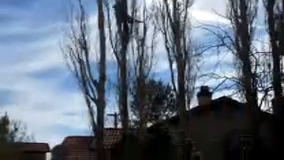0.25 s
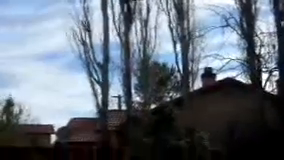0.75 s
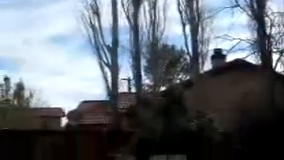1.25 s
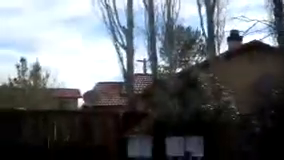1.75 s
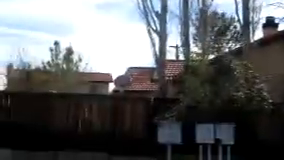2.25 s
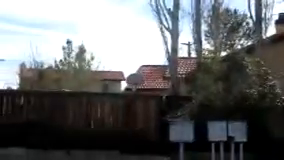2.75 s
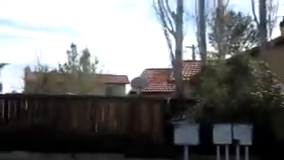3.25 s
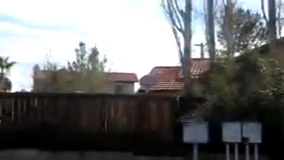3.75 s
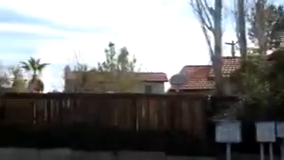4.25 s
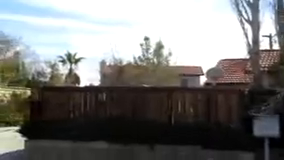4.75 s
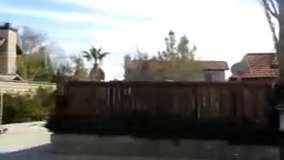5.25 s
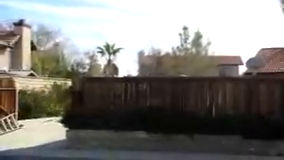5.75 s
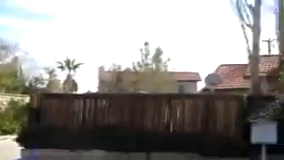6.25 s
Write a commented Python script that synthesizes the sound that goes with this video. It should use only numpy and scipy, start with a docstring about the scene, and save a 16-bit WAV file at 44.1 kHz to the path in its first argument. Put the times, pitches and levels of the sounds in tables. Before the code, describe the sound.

A two-stroke chainsaw is pull-started high in a tree, with a hiss and a few plastic knocks. It catches, blips twice with a brief clutch rattle and climbs to a sputtering top speed. It sinks to an uneven, booming idle with faint ticks and two tiny chirps, then revs again. The microphone is across the street, with light wind, a far hum and short echoes off houses.

```python
"""Light wind and a far hum. High in a tree a two-stroke chainsaw is pulled: the fan hisses, the casing
knocks, the engine catches. Exhaust pops, crank and sprocket tones and chain hiss rise in two blips, the
clutch rattling at first, then climb to a misfiring limit. The saw drops to an uneven, booming idle; faint
bursts of bright noise and two chirps are heard; it revs again. A microphone across the street hears it
directly, off the ground and off houses and fences."""
import sys
import numpy as np
from scipy import signal
from scipy.fft import rfft, irfft, next_fast_len
from scipy.io import wavfile
from scipy.ndimage import uniform_filter1d

SR = 44100
rng = np.random.default_rng(int(sys.argv[2]) if len(sys.argv) > 2 else 0)


def dump(signal):
    """Clip the signal to [-1, 1] and save it as 16-bit WAV at the path in sys.argv[1]."""
    limited = np.clip(np.atleast_2d(signal).T, -1, 1)
    pcm = np.round(limited * 32767).astype(np.int16)
    wavfile.write(sys.argv[1], SR, pcm)


N = 285768
CRUISE_HZ = 150  # reference crank speed

# Crank speed between the revs. Each row: time in seconds, speed in Hz.
IDLE_SPEED = [(2.54, 53), (2.62, 45), (2.76, 38.5), (2.82, 41), (2.87, 54), (2.92, 58), (3, 46), (3.15, 38),
              (3.3, 31), (3.7, 27.5), (5, 27.5), (5.2, 31), (5.24, 38), (5.29, 40), (5.32, 50)]
# Each row: start and end in seconds, n (every nth firing is weak), loss in dB.
MISFIRES = [(1.645, 1.9, 3, 11), (6.045, 6.6, 2, 6)]
# Muffler response. Each row: frequency in Hz, gain in dB.
MUFFLER_RESPONSE = [(25, -57.5), (60, -24), (130, -8.5), (230, -4), (280, 4), (330, -5.5), (400, -1),
                    (440, 0), (490, 3), (580, 0), (700, 4), (790, 3.5), (900, -3), (1050, 1.5),
                    (1200, -4.5), (1300, -9.5), (1800, -21), (2800, -21.5), (5000, -44), (9000, -66)]


def gain_of(db):
    """dB to a factor."""
    return 10 ** (np.asarray(db) / 20)


def evened(x, span_s=0.054):
    """Divides out the slow level, leaving rms 1."""
    return x / np.sqrt(abs(uniform_filter1d(x ** 2, int(span_s * SR))) + 1e-20)


def at_hz(points, hz):
    """A spectrum table read on a log frequency axis."""
    table_hz, value = np.transpose(points)
    return np.interp(np.log(hz + 1), np.log(table_hz + 1), value)


def curve(rows, column=1, outside=None):
    """One column of a time table at every sample."""
    rows = np.array(rows)
    return np.interp(np.arange(N) / SR, rows[:, 0], rows[:, column], outside, outside)


def gate(start_s, end_s, ramp_s):
    """1 between two times, with linear edges."""
    t = np.arange(N) / SR
    return np.clip(np.minimum(t - start_s, end_s - t) / ramp_s + .5, 0, 1)


def drift(rate_hz):
    """Smooth noise of rms 1."""
    width = int(SR / rate_hz)
    x = uniform_filter1d(uniform_filter1d(rng.standard_normal(N), width), width)
    return x / x.std()


def late(x, delay_s):
    """Plain delay."""
    return np.concatenate([np.zeros(int(delay_s * SR)), x])[:N]


def coloured(x, response):
    """Minimum-phase filter from rows of Hz and dB."""
    hz = abs(np.fft.fftfreq(8192, 1 / SR))
    log_gain = np.log(gain_of(np.maximum(at_hz(response, hz), -100)))
    taps = np.fft.ifft(np.exp(np.conj(signal.hilbert(log_gain)))).real[:4096]
    return signal.oaconvolve(x, taps)[:len(x)]


def scatter(x, stages):
    """All-pass stages spread each pop in time and keep its colour."""
    for delay_s, share in stages:
        gap = np.zeros(int(delay_s * SR) - 1)
        x = signal.lfilter(np.r_[-share, gap, 1], np.r_[1, gap, -share], x)
    return x


def patchy(x, depth_db, width_hz, span_s):
    """Random patches of the spectrum swell and fade."""
    spectra = signal.stft(x, nperseg=512)[2]
    field = uniform_filter1d(rng.standard_normal(spectra.shape), round(width_hz * 512 / SR), axis=0)
    field = uniform_filter1d(field, round(span_s * SR / 256), axis=1)
    return signal.istft(spectra * gain_of(depth_db * field / field.std()), nperseg=512)[1][:N]


def bursts(events, spectrum, decay_s):
    """Short decaying bursts of coloured noise."""
    out, t = np.zeros(N), np.arange(1500) / SR
    envelope = np.exp(-t / decay_s) * np.minimum(t / .002, 1)
    for start_s, db in events:
        noise = coloured(rng.standard_normal(len(t)), spectrum)
        out[round(start_s * SR):][:len(t)] += gain_of(db) * envelope * noise / noise.std()
    return out


def idling():
    """1 between the two revs."""
    return gate(IDLE_SPEED[0][0], IDLE_SPEED[-1][0], ramp_s=.1)


def crank():
    """Crankshaft turns, a whole number at each firing."""
    # The catch and the two revs. Each row: time in seconds, speed in Hz.
    catch = [(.33, 36.8), (.385, 51), (.42, 57), (.47, 51)]
    revs = [
        [(.5, 55.2), (.548, 66.6), (.576, 72.4), (.64, 83), (.692, 90.5), (.75, 76), (.79, 69), (.882, 78.3),
         (.93, 86.7), (1.012, 108), (1.05, 113.4), (1.124, 98.5), (1.23, 129.7), (1.312, 150.4), (1.378, 165.8),
         (1.438, 177.3), (1.514, 189.8), (1.646, 203.3), (1.874, 200.8), (1.896, 197), (1.978, 172.2),
         (2.126, 131.8), (2.284, 93), (2.46, 61.1)],
        [(5.36, 61.7), (5.44, 74.5), (5.608, 82.1), (5.78, 107.8), (5.946, 131.1), (6.052, 139.7),
         (6.204, 150.1), (6.298, 153.9), (6.48, 149.5)],
    ]
    # Strong firings kick the idling crank. Each row: time in seconds, speed gained in Hz.
    kicks = [(3.305, 15), (3.44, 5), (3.53, 7), (3.79, 13), (3.985, 9), (4.085, 12), (4.375, 12),
             (4.525, 10), (4.645, 10), (4.772, 8), (4.855, 15), (5.085, 4)]
    t, kick_decay_s = np.arange(N) / SR, .11
    hunting = .018 * idling() * drift(rate_hz=16)
    speed_hz = curve(catch + list(revs[0]) + IDLE_SPEED + list(revs[1]))
    kick_hz = sum(hz * (t > s) * np.exp(-abs(t - s) / kick_decay_s) for s, hz in kicks)
    return np.cumsum(speed_hz * (1 + hunting) + kick_hz) / SR


def throttle():
    """Throttle opening, 0-1."""
    # Each row: press and release in seconds, depth 0-1.
    pulls = [(0.367, 0.389, 0.5), (0.464, 0.672, 0.65), (0.804, 0.982, 0.61), (1, 1.053, 0.1),
             (1.155, 1.887, 0.57), (2.778, 2.91, 0.79), (2.91, 2.97, 0.6), (2.97, 3.037, 0),
             (5.12, 5.238, 0.3), (5.24, 5.678, 1), (5.693, 5.972, 0.64), (5.97, 6.6, 0.81)]
    return np.clip(sum(depth * gate(start, end, ramp_s=.03) for start, end, depth in pulls), 0, 1)


def revved(turns, idle_hz=38.3, fast_hz=78.3):
    """0 at idle, 1 once the engine runs fast."""
    return np.clip((np.gradient(turns) * SR - idle_hz) / (fast_hz - idle_hz), 0, 1)


def running_gain(turns, open_db, shut_db, octave_db):
    """Gain of a part of the saw, from throttle, speed and the microphone's aim."""
    # The microphone swings away. Each row: time in seconds, gain in dB.
    aim = [(.335, -24), (.352, 4), (.45, 4.5), (.6, 2.5), (.78, 4), (.95, 4.5), (1.1, 3.5), (1.3, 1.4),
           (1.6, -2.5), (1.9, -3.5), (2.2, 2), (2.42, 2.5), (2.6, 3), (2.75, 1), (3.0, 1.5), (3.5, -1.5),
           (4.0, -3), (4.5, -5.5), (5.0, -7), (5.35, -3), (5.65, -3.5), (5.92, -3.5), (6.05, -4.5),
           (6.25, -6.5), (6.48, -5.5)]
    octaves = np.log2(np.gradient(turns) * SR / CRUISE_HZ)
    level_db = shut_db + (open_db - shut_db) * throttle() + octave_db * octaves
    return gain_of(level_db + curve(aim, outside=-120))


def wind():
    """Wind on the microphone ports and distant drone: noise with drifting spectral patches."""
    # Each row: frequency in Hz, density in dB.
    spectrum = [(13, -58.5), (22, -2), (49, 8), (134, 4), (675, -4), (1290, -8.5), (2200, -24),
                (3400, -36.5), (3650, -33.5), (4220, -57), (7000, -44), (9100, -123), (15400, -120)]
    # Each row: frequency in Hz, left-right correlation.
    correlation = [(30, -0.61), (120, -0.72), (400, -0.44), (2000, -0.17), (8000, -0.38)]
    # Each row: time in seconds, gain in dB.
    gusts = [(0, 0), (1, 10.5), (2, 5), (3, 6.5), (4, 4), (5, 5), (5.5, 8), (6, 12), (6.48, 16.5)]
    frames, hz = N // 512 + 5, np.fft.rfftfreq(2048, 1 / SR)
    a, b, c, d, patches = rng.standard_normal((frames, len(hz), 5)).T
    patches = uniform_filter1d(uniform_filter1d(patches, 8, axis=0), 12, axis=1)
    same = at_hz(correlation, hz)[:, None]
    left = a + 1j * b
    right = same * left + np.sqrt(1 - same ** 2) * (c + 1j * d)
    shape = gain_of(at_hz(spectrum, hz)[:, None] + 1.5 * patches / patches.std())
    noise = signal.istft(np.array([left, right]) * shape, nperseg=2048, noverlap=1536)[1][:, :N]
    return gain_of(curve(gusts) - 51) * noise / noise.mean(0).std()


def hum(pitch_hz=59.6, level_db=-49.5):
    """A far, wavering tone, stronger on the left."""
    tone = np.cos(2 * np.pi * (pitch_hz * np.arange(N) / SR + .3 * drift(rate_hz=1.5)))
    return gain_of(level_db + 2.6 * drift(rate_hz=4)) * tone * np.array([[1.], [.3]])


def chain_and_fan(turns):
    """Chain links and cooling fan: throbbing hiss, with a rasping click each turn at speed."""
    # Resonances of chain, bar and fan housing. Each row: frequency in Hz, gain in dB.
    resonances = [(650, -30.5), (1100, -1.5), (1230, -6), (1280, -11), (1390, -10), (1540, -8.5),
                  (1770, -7.5), (1860, -9), (1970, -20.5), (2130, -11), (2350, -19), (2710, -10),
                  (3090, -19), (3480, -15), (3730, -14), (4100, -26), (4470, -17.5), (5090, -25.5),
                  (5450, -26.5), (5740, -32.5), (6200, -25), (6940, -23), (7490, -29.5), (8170, -19.5),
                  (8600, -22.5), (11200, -59), (18900, -120)]
    # The starter spins the fan. Each row: time in seconds, level in dB.
    starter = [(.262, -64), (.285, -56.5), (.31, -48), (.34, -71)]
    throb = 1.3 + np.exp(-(turns % 1) / .25)
    clicks = np.diff(np.floor(turns), prepend=0) * gain_of(rng.standard_normal(N))
    drive = evened(throb * rng.standard_normal(N)) + gain_of(1) * revved(turns) * evened(clicks)
    hiss = patchy(evened(coloured(drive, resonances)), depth_db=3, width_hz=200, span_s=.12)
    running = running_gain(turns, open_db=-33.5, shut_db=-34, octave_db=14.5)
    return (running + gain_of(curve(starter, outside=-120))) * hiss


def knocks():
    """The starter cord and short blows ring the plastic casing."""
    # Each row: start in seconds, level in dB, pitch factor.
    blows = [(0.286, -35.5, 0.91), (0.295, -33.5, 0.95), (0.302, -40.5, 0.69), (0.314, -27, 1.0),
             (0.377, -32, 1)]
    # Each row: frequency in Hz, level in dB, t60 in seconds.
    modes = [(665, 0, 0.09), (1070, 6.5, 0.055), (1878, -2.5, 0.05), (2120, -9, 0.027)]
    out, t = np.zeros(N), np.arange(3000) / SR
    attack = np.minimum(t / .003, 1)
    for start_s, blow_db, pitch in blows:
        ring = sum(gain_of(db - 60 * t / t60) * np.sin(2 * np.pi * hz * pitch * t)
                   for hz, db, t60 in modes)
        out[round(start_s * SR):][:len(t)] += gain_of(blow_db - 3) * ring * attack
    return out


def exhaust(turns):
    """One uneven pop a turn with a puff of turbulent gas behind it; soft at idle, sharp at speed."""
    # The idle pop. Each row: frequency in Hz, gain in dB.
    putt = [(25, -57.5), (60, -30.5), (110, -13.5), (155, 3.5), (195, 2), (235, -2), (320, -7.5), (400, 1),
            (620, -0.5), (700, -5), (800, -2), (885, -17.5), (1000, -1.5), (1400, -26), (2500, -18.5),
            (3300, -31), (4500, -36), (5200, -44.5), (7000, -65.5), (9000, -71)]
    # It rattles around the muffler can. Each row: delay in seconds, all-pass share.
    smear = [(.0034, .3)]
    rough_open, rough_coast, rough_idle = .05, .14, .08  # puffs' share of the drive power
    idle_spread_db, span_s = 2.2, .16
    firing, fast = np.floor(turns).astype(int), revved(turns)
    rough_fast = rough_coast + np.minimum(2 * throttle(), 1) * (rough_open - rough_coast)
    rough = rough_idle + fast * (rough_fast - rough_idle)
    loss_db = sum(db * gate(start, end, .03) * (firing % nth == 0) for start, end, nth, db in MISFIRES)
    spread_db = 9 * rough + idle_spread_db * (1 - fast)
    strength = gain_of(spread_db * rng.standard_normal(N)[firing] - loss_db)
    pops = np.diff(firing, prepend=0) * strength
    puffs = (.06 + np.exp(-(turns % 1) / .22)) * strength * rng.standard_normal(N)
    drive = np.sqrt(1 - rough) * evened(pops, span_s) + np.sqrt(rough) * evened(puffs, span_s)
    sharp = evened(coloured(drive, MUFFLER_RESPONSE))
    soft = evened(scatter(coloured(drive, putt), smear), span_s)
    gas = fast * sharp + (1 - fast) * soft
    return running_gain(turns, open_db=-24.5, shut_db=-30, octave_db=5.5) * gas


def crank_tones(turns, waver_db=1.8, grit_db=2.2):
    """Harmonics of the crank; orders 6 and 12 are the six sprocket teeth."""
    # Each order: level in dB with throttle open, with it shut, dB per octave of speed.
    orders = {1: (-23.5, -47, 13.5), 2: (-29.5, -36, 18.5), 3: (-32.5, -46, 9), 4: (-22.5, -36, 20),
              5: (-30.5, -39, 10.5), 6: (-27.5, -27, 9.5), 7: (-29.5, -62, -3.5), 8: (-35, -57, -7.5),
              9: (-31, -46.5, 5), 12: (-49, -26, 4.5)}
    # Swells of order 3, order 4 and the teeth. Each row: time in seconds, gain in dB.
    third = [(.5, 14.5), (.68, 10), (.74, -10.5), (.8, 11), (.93, 9.5), (1.02, -17), (1.2, -17.5),
             (1.3, -22), (1.4, -20), (1.5, 7.5), (1.88, 12.5), (2.1, -4.5), (5.3, 6.5), (5.85, 4),
             (6.05, -3), (6.48, -4)]
    fourth = [(.5, -6), (.95, -31), (1.08, -17.5), (1.2, -24), (1.26, 11), (1.36, 7.5), (1.44, 10),
              (1.52, 14.5), (1.6, 3), (1.7, 5.5), (1.87, -2.5), (2.3, 6), (5.4, 12.5), (5.8, 3), (6.1, 7.5),
              (6.48, 7)]
    teeth = [(.5, -4), (.69, -8.5), (.705, 1.5), (.74, 4), (.77, -12.5), (.84, 7.5), (.97, 3), (1.01, -9),
             (1.05, -16), (1.08, -3), (1.25, 10), (1.5, -2.5), (1.6, -17), (1.7, -8.5), (1.87, -4),
             (1.92, 1), (2.05, 12), (2.2, 3.5), (2.26, -9.5), (2.29, -1), (2.33, 0), (2.37, 0), (2.42, 1),
             (5.4, -8), (5.7, 2.5), (5.97, -25), (6.03, 12.5), (6.2, 15), (6.48, 12)]
    # Each row: time in seconds, gains in dB of orders 5, 7 and 8.
    upper = [(.5, 3.5, 6.5, 2.5), (.58, 4, -4, -3.5), (.64, -2, -2, 13.5), (.69, -8, -2, 11),
             (.75, -4, -2, -3), (.82, 0, 5.5, 3.5), (.88, 7, 7.5, 3.5), (.95, 4, 7, 0), (1, -1, 1.5, 3),
             (1.05, -1.5, 8.5, 2), (1.15, -9, 3, 4.5), (1.3, -5, -0.5, 3), (1.45, 1.5, -1.5, 1),
             (1.6, 6, -1.5, -1), (1.9, 4.5, -2, -2.5), (2.1, 10, -2, 4), (2.4, 0, -0.5, 1.5),
             (5.4, 6.5, 3, -3.5), (5.8, -2.5, -6.5, -6.5), (6.1, 5, 4, 4.5), (6.48, -3, 3.5, 1.5)]
    # Colour of the tones, with dips from the ground reflection. Each row: frequency in Hz, gain in dB.
    colour = [(55, -9.5), (82, 23.5), (110, 12), (140, 14.5), (190, 10), (235, 2.5), (275, -0.5), (320, -3),
              (410, -1), (500, -13.5), (600, -7.5), (660, -5), (720, -29), (775, -16), (820, -10),
              (880, -10.5), (950, -3), (1050, -2), (1150, 5.5), (1260, -26.5), (2500, -2)]
    swell_db = {3: curve(third), 4: curve(fourth), 6: curve(teeth), 12: curve(teeth),
                5: curve(upper, 1), 7: curve(upper, 2), 8: curve(upper, 3)}
    tones, speed_hz = np.zeros(N), np.gradient(turns) * SR
    for order, levels in orders.items():
        db = at_hz(colour, order * speed_hz) + waver_db * drift(rate_hz=31) + swell_db.get(order, 0)
        tone = np.cos(2 * np.pi * (order * turns + .01 * drift(rate_hz=25)))
        tones += running_gain(turns, *levels) * gain_of(db) * tone
    # Misfires beat the tones at a fraction of the crank speed.
    beat = 1 - sum(.6 * (1 - gain_of(-db)) * gate(start, end, .03) * np.cos(2 * np.pi * turns / nth)
                   for start, end, nth, db in MISFIRES)
    # Near full speed each firing shakes them at random.
    shake = uniform_filter1d(rng.standard_normal(N)[np.floor(turns + .5).astype(int)], size=60)
    grit = gain_of(grit_db * np.minimum(speed_hz / CRUISE_HZ, 1) ** 2 * shake)
    return coloured(revved(turns) * beat * grit * tones, MUFFLER_RESPONSE)


def clutch():
    """The clutch rattles as the engine picks up."""
    # Each row: start in seconds, level in dB.
    rattles = [(.376, -34.5), (.465, -43.5), (.488, -38.5), (.527, -39), (.555, -30.5), (.584, -31.5),
               (.611, -32.5)]
    # Each row: frequency in Hz, gain in dB.
    spectrum = [(800, -10), (1500, -10), (1900, 0), (2250, -10), (2750, 0), (3300, -10), (4500, -20),
                (8500, -26)]
    return bursts(rattles, spectrum, decay_s=.0097)


def muffler_boom(turns, width_hz=140, spread_db=3):
    """At idle each firing briefly rings the modes of the muffler can, each at a random strength."""
    modes_hz, modes_db = (165, 235, 620), (-.5, 2.5, -8)
    firing, ring = np.floor(turns).astype(int), np.zeros(N)
    for hz, db in zip(modes_hz, modes_db):
        pops = np.diff(firing, prepend=firing[0]) * gain_of(db + spread_db * rng.standard_normal(N))
        b, a = signal.iirpeak(hz, hz / width_hz, SR)
        ring += signal.lfilter(b, a, signal.lfilter(b, a, pops))
    slow_hz, slow_db, octave_db = 28.4, -42.5, -9
    speed_hz = uniform_filter1d(np.gradient(turns) * SR, size=8000)
    level_db = slow_db + octave_db * np.log2(speed_hz / slow_hz)
    return idling() * gain_of(level_db) * evened(ring, span_s=.43)


def bright_bursts():
    """Faint, brief bursts of bright noise."""
    # Each row: start in seconds, level in dB.
    events = [(3.1898, -47), (3.3, -46), (3.7905, -46), (3.974, -49), (4.057, -48), (4.355, -50),
              (4.571, -50), (4.773, -51)]
    # Each row: frequency in Hz, gain in dB.
    spectrum = [(800, -14), (2000, 0), (3500, 5), (5000, 6), (7000, 4), (8500, 4)]
    return bursts(events, spectrum, decay_s=.0038)


def chirps():
    """Two brief tones that slide down."""
    # Each row: start in seconds, level in dB, start and target pitch in Hz, length in seconds.
    slides = [(4.061, -37, 1700, 900, .012), (4.045, -57, 4900, 3300, .05)]
    out = np.zeros(N)
    for start_s, db, start_hz, target_hz, length_s in slides:
        progress = np.arange(int(length_s * SR)) / (length_s * SR)
        hz = target_hz + (start_hz - target_hz) * np.exp(-progress / .5)
        tone = np.sin(2 * np.pi * np.cumsum(hz) / SR)
        out[round(start_s * SR):][:len(tone)] += gain_of(db) * np.sin(np.pi * np.sqrt(progress)) * tone
    return out


def ground_bounce(x, delay_s=.00505):
    """The street reflects the saw, later and weaker."""
    # Each row: frequency in Hz, gain in dB.
    reflection = [(100, -12), (500, -1.5), (900, -21), (1500, -7.5)]
    size = next_fast_len(N + SR)
    gain = gain_of(at_hz(reflection, np.fft.rfftfreq(size, 1 / SR)))
    return late(irfft(rfft(x, size) * gain, size), delay_s)


def direct(x):
    """Sound at the two ports of a panning microphone, shaded by its body."""
    # Each row: frequency in Hz, left minus right in dB.
    shading = [(60, 9.5), (100, 2), (180, 2), (310, 0), (530, 2.5), (920, -3), (1600, -18), (2760, -5),
               (4770, -4.5), (8240, -3)]
    # Each row: frequency in Hz, left phase lead in radians.
    lead = [(60, -1.6), (260, -0.29), (600, -0.66), (1210, -1.6), (1550, 0.94), (2200, 1), (4000, 0.55),
            (9000, 0.71)]
    # Each row: time in seconds, left minus right in dB.
    pan = [(0, 2), (1, -2), (1.5, -0.5), (2.2, -4), (2.7, 1.5), (3.5, 1.5), (5, 2.5), (5.7, -3.5),
           (6.48, -2)]
    size = next_fast_len(N + SR)
    hz, side = np.fft.rfftfreq(size, 1 / SR), np.array([[.5], [-.5]])
    ports = gain_of(side * at_hz(shading, hz)) * np.exp(1j * side * at_hz(lead, hz))
    return irfft(rfft(x, size) * ports, size)[:, :N] * gain_of(side * curve(pan))


def house_echoes(x, right_lag_s=.00056):
    """One echo from each house front."""
    # Each row: delay in seconds, left and right gain in dB.
    fronts = [(0.013, -22.5, -14.5), (0.032, -47.5, -28), (.062, -34, -27.5), (.105, -22.5, -21),
              (0.167, -14.5, -46)]
    return sum(gain_of([[left], [right]]) * np.array([late(x, s), late(x, s + right_lag_s)])
               for s, left, right in fronts)


def yard_tail(x, level_db=-9):
    """Diffuse mono tail off houses and fences: sparse decaying taps of random sign."""
    # Each row: frequency in Hz, t60 in seconds.
    decay = [(100, 0.12), (500, 0.33), (1500, 0.92), (4000, 0.83), (9000, 0.056)]
    taps, slots = np.zeros(SR), np.arange(400, SR - 20, 20)
    taps[slots + rng.integers(0, 20, len(slots))] = rng.choice([-1., 1.], len(slots))
    hz, t, spectra = signal.stft(taps, SR, nperseg=256)
    tail = signal.istft(spectra * gain_of(-60 * t / at_hz(decay, hz)[:, None]), SR, nperseg=256)[1]
    return gain_of(level_db) * signal.fftconvolve(x, tail / np.linalg.norm(tail))[:N]


def scene():
    """The saw in its tree and its reflections, over wind and hum."""
    # Scattering on trunk and limbs. Each row: delay in seconds, all-pass share.
    branches = [(.0006, .5), (.0013, .5), (.0023, .5)]
    turns = crank()
    engine = exhaust(turns) + crank_tones(turns) + chain_and_fan(turns)
    saw = scatter(engine, branches) + knocks() + chirps()
    source = saw + ground_bounce(saw) + muffler_boom(turns) + bright_bursts() + clutch()
    return direct(source) + house_echoes(source) + yard_tail(source) + wind() + hum()


def record(dry):
    """Steep low-pass: the microphone's band limit."""
    edge_hz = 8620
    taps = signal.firwin(1023, edge_hz, window=("kaiser", 10), fs=SR)
    return signal.oaconvolve(dry, taps[None], "same")


dry = scene()
out = record(dry)
dump(out)
```